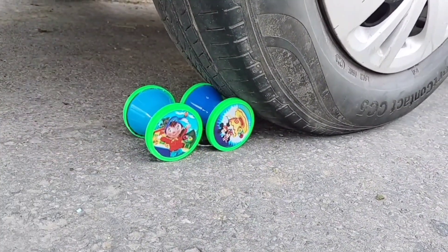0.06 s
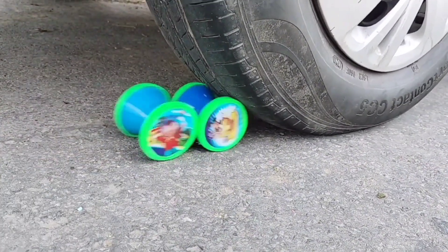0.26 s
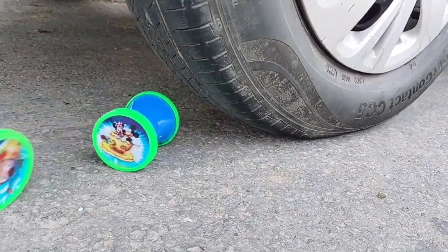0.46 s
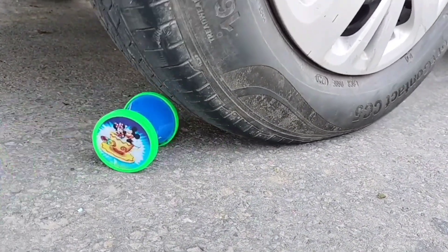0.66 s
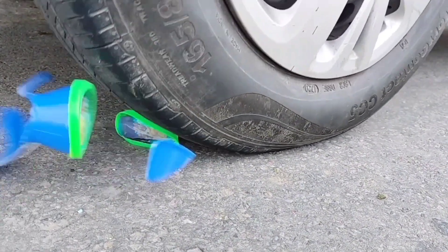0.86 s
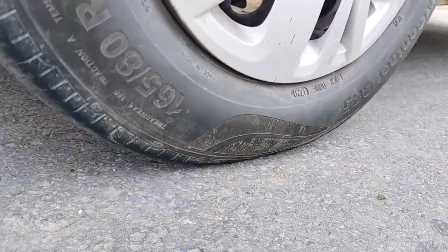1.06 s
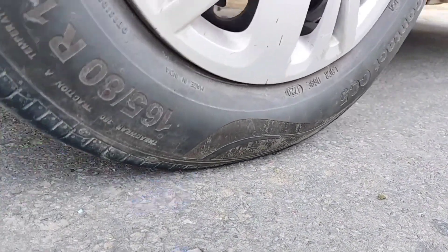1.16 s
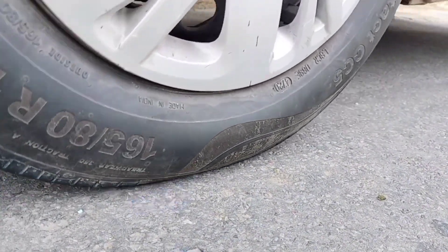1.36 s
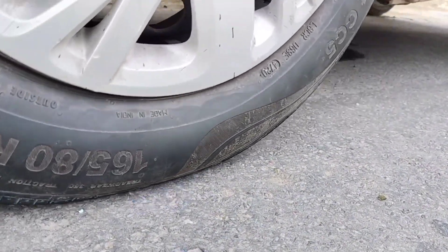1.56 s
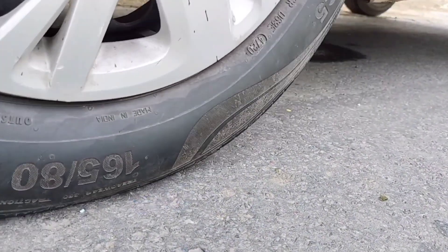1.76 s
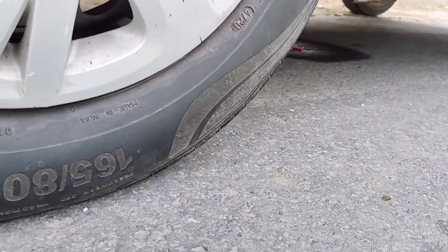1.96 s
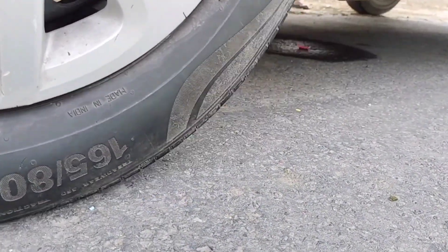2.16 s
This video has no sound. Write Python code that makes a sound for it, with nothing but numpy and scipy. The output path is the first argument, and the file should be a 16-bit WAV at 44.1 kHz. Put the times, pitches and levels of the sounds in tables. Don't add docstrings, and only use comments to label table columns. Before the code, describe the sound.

Hollow plastic toys are crushed by a car tyre on asphalt, close and left-leaning. A low engine rumbles, with faint bird chirps at 0 and 0.35 s. A creak at 0.15 leads to a sharp burst near 0.25; a rolling cup hums and rattles. Loudest cracks and hollow buckling come at 0.7-0.9, snaps and hard knocks until 1.35, then sparse ticks and knocks under low wind buffeting to 2.2.

```python
import sys
import numpy as np
from scipy import signal
from scipy.fft import rfft, irfft, next_fast_len
from scipy.io import wavfile
from scipy.ndimage import map_coordinates

SR = 44100
rng = np.random.default_rng(int(sys.argv[2]) if len(sys.argv) > 2 else 0)


def transcribe(signal):
    frames = np.atleast_2d(signal).T
    limited = np.clip(frames, -1, 1)
    pcm = np.round(limited * 32767).astype(np.int16)
    wavfile.write(sys.argv[1], SR, pcm)


def natural_amplitude(level_db):
    exponent = np.asarray(level_db, float) / 20
    return 10 ** exponent


N = 97020

# (frequency [Hz], level [dB])
SHELL_COLOUR = [(200, -16), (600, -2.5), (2000, -6), (8000, -5.5), (16000, -8)]
# (frequency [Hz], level [dB])
BURST_COLOUR = [(150, 9), (400, 6), (1300, 3.5), (3200, -4), (8900, -12.5), (16000, -6.5)]


def unit(x):
    return x / np.sqrt(np.mean(x ** 2, axis=-1, keepdims=True) + 1e-20)


def along(points, hz):
    f, v = np.transpose(points)
    return np.interp(np.log(hz + 1), np.log(f + 1), v)


def curves(rows):
    s, *cols = np.transpose(rows)
    return [np.interp(np.arange(N) / SR, s, c) for c in cols]


def wobble(rate):
    knots = rng.standard_normal(int(N * 200 / SR))
    return map_coordinates(knots, [np.arange(N) * rate / SR])


def filtered(x, response):
    n = x.shape[-1]
    m = next_fast_len(n + 8192)
    return irfft(rfft(x, m) * response(np.fft.rfftfreq(m, 1 / SR)), m)[..., :n]


def noise(spectrum, size=N):
    return unit(filtered(rng.standard_normal(size), lambda hz: natural_amplitude(along(spectrum, hz))))


def add(track, s, x):
    part = track[..., max(round(s * SR), 0):][..., :x.shape[-1]]
    part += x[..., :part.shape[-1]]


def dying(t60, rise_s=0.000063):
    t = np.arange(SR * 2 // 5) / SR
    decay = natural_amplitude(-60 * t / max(t60, .004))
    return t, decay * (1 - np.exp(-t / rise_s))


def ringing(modes):
    def response(f):
        total = 0
        for k, (c, w, db) in enumerate(modes):
            total = total + (-1) ** k * natural_amplitude(db) * 1j * f * w / (c * c - f * f + 1j * f * w)
        return total
    return response


def engine():
    # (frequency [Hz], level [dB])
    colour = [(20, -1.5), (60, 5.5), (220, -8.5), (450, -15), (1200, -30), (3000, -124)]
    shared = noise(colour)
    left = shared + 0.55 * noise(colour)
    right = shared + 0.39 * noise(colour)
    return natural_amplitude(-48 + 0.34 * wobble(11.2)) * np.array([left, right])


def wind():
    # (time [s], level [dB])
    gusts = [(0, -60), (1.1, -69), (1.2, -40.5), (1.335, -63), (1.365, -36), (1.44, -49), (1.48, -41.5),
             (1.57, -51), (1.615, -37.5), (1.72, -49), (1.79, -34), (1.81, -41), (1.87, -31), (1.93, -38),
             (1.98, -61), (2.14, -47.5), (2.2, -65)]
    # (frequency [Hz], level [dB])
    buffet = [(20, 2.5), (90, 8.5), (250, -8), (500, -92), (1200, -76)]
    lumpy = unit(natural_amplitude(3.3 * wobble(31.77)) * noise(buffet))
    left = 1.66 * np.tanh(lumpy)
    right = natural_amplitude(-16) * noise(buffet)
    return natural_amplitude(curves(gusts)[0] + 10.0) * np.array([left, right])


def bird():
    # (time [s], length [s], start pitch [Hz], end pitch [Hz], level [dB])
    chirps = [
        (0, .022, 6150, 5330, -41),
        (0.022, 0.023, 3970, 5130, -43),
        (0.351, 0.0224, 6160, 5400, -45),
    ]
    out = np.zeros(N)
    for s, length, from_hz, to_hz, db in chirps:
        u = np.linspace(0, 1, int(length * SR))
        turn = 2 * np.pi * np.cumsum(from_hz + (to_hz - from_hz) * u) / SR
        add(out, s, natural_amplitude(db) * np.sin(np.pi * u) ** .5 * np.sin(turn))
    return out


def crunch():
    # (time [s], crunch level [dB])
    press = [(0, -63.5), (.22, -55.5), (.28, -48), (.46, -48.5), (.535, -40), (.55, -57.5), (.69, -58.5),
             (.72, -36), (.86, -37.5), (1.0, -49.5), (1.15, -35.5), (1.29, -48), (1.42, -50), (1.6, -56),
             (1.7, -47), (1.9, -60.5), (2.05, -60), (2.2, -67)]
    # (frequency [Hz], level [dB])
    grit_colour = [(250, -44), (600, 0), (1500, -6), (3000, 10), (6000, 8), (9000, 5.5), (16000, -8)]
    # (frequency [Hz], width [Hz], level [dB])
    body_modes = [(915, 15, 14), (1112, 11.6, 13.5), (1297, 11, 4.5), (1533, 15, 10), (1678, 48, 10.5),
                  (2286, 36, 2.5), (2673, 90, 7), (3430, 16, -5.5), (3790, 51, -8)]
    grains_per_s, grain_hz, grain_octaves = 900, 7800, 0.66
    grain_spread_db, grain_cycles = 3, 2.5
    grind_db, body_db = 1.5, 0.5
    bright_hz, bright_grows, full_db = 6200, .85, -39

    db, = curves(press)
    count = int(min(grains_per_s * N / SR, 4000))
    when, high, size, life = rng.random((4, 4000))[:, :count]
    octaves = grain_octaves * np.log(high / (1 - high)) / 2
    hz = np.clip(grain_hz * 2 ** octaves, 3500, 21000)[:, None]
    i = np.arange(600)
    turns = hz * i / SR
    strength = natural_amplitude(grain_spread_db * np.minimum(-np.log(size), 3))[:, None]
    decay = np.exp(-turns / (grain_cycles * (life[:, None] + .3)))
    shape = strength * np.sin(2 * np.pi * turns) * decay
    place = (when * N).astype(int)[:, None] + i
    grains = np.bincount(place.ravel(), shape.ravel(), minlength=N)[:N]

    grind = unit(filtered(noise(BURST_COLOUR), lambda f: f ** 2 / (f ** 2 + 600 ** 2)))
    grit = unit(filtered(grains, lambda f: natural_amplitude(along(grit_colour, f)))) + natural_amplitude(grind_db) * grind
    treble = filtered(grit, lambda f: 1 / (1 + (bright_hz / (f + 1)) ** 6))
    grit = grit - treble * (1 - natural_amplitude(bright_grows * np.minimum(db - full_db, 0)))
    body = unit(filtered(rng.standard_normal(N), ringing(body_modes)))
    return natural_amplitude(db + 2.13 * wobble(29.41)) * (grit + natural_amplitude(body_db) * body)


def splinters():
    # (time [s], peak level [dB], pitch [Hz])
    breaks = [(0.0434, -45, 4850), (0.075, -47, 3000), (0.0918, -41.5, 7160), (0.3055, -34, 3280),
              (0.32, -32, 3000), (0.3842, -26, 4470), (0.3938, -29, 9300), (0.4034, -41, 3060),
              (0.4276, -36, 4910), (0.4374, -42, 3270), (0.5036, -32, 6300), (0.5695, -21, 5770),
              (0.5824, -38, 3100), (0.623, -24.5, 3830), (0.7228, -34, 3430), (0.737, -24, 5020),
              (0.7733, -26, 5600), (0.7976, -32, 3040), (0.7976, -27, 3500), (0.9348, -26, 4640),
              (0.958, -19, 3220), (0.9764, -39, 3460), (0.9824, -31, 5200), (1.005, -23.5, 3150),
              (1.032, -22.5, 4090), (1.066, -21, 4500), (1.1001, -20, 4960), (1.1413, -21.5, 12600),
              (1.1657, -23, 5440), (1.2154, -31, 5200), (1.2301, -22.5, 4120), (1.4365, -34, 4970),
              (1.641, -36, 5800), (1.728, -35.5, 4200), (1.7644, -45, 4070), (1.8208, -36.5, 6310),
              (2.0093, -39.5, 3300)]
    ring_db, width_share, low_hz = 2, .05, 3000
    out = np.zeros(N)
    for s, db, pitch_hz in breaks:
        t, env = dying(.014)
        others = rng.uniform(3000, 14000, size=3)
        modes = ringing([(c, width_share * c, ring_db - 6 * (c != pitch_hz)) for c in [pitch_hz, *others]])
        tick = filtered(env * rng.standard_normal(len(t)),
                        lambda f: modes(f) - 0.19 * (f / (low_hz + 1j * f)) ** 2)
        add(out, s, natural_amplitude(db + 3) * tick / np.abs(tick).max())
    return out


def creak():
    # (time [s], pitch [Hz], level [dB])
    slips = [
        (.112, 570, -52.5),
        (.138, 600, -66),
        (.146, 639, -37.5),
        (.19, 668, -55),
        (.2, 683, -42),
        (.235, 740, -71),
    ]
    t = np.arange(N) / SR
    hz, db = curves(slips)
    turn = 2 * np.pi * np.cumsum(hz + 4 * wobble(128)) / SR
    tone = np.sin(turn) + 0.037 * np.sin(3 * turn)
    return natural_amplitude(db + 15) * tone * (t > slips[0][0]) * (t < slips[-1][0])


def snaps():
    # (time [s], peak level [dB], pitch [Hz], t60 [s],
    # treble [dB])
    breaking = [(0.136, -25.5, 1420, 0.083, -5.5), (0.147, -18, 1770, 0.016, -8.5),
                (0.199, -30.5, 1000, 0.027, -6), (0.2, -29, 1680, 0.021, -27),
                (0.232, -19, 1320, 0.078, -9.5), (0.239, -17.5, 4200, 0.022, 1),
                (0.246, -1.5, 780, 0.029, -19), (0.257, -17.5, 1150, 0.19, -48),
                (0.317, -25, 1180, 0.053, -18), (0.377, -22.5, 740, 0.16, -29),
                (0.437, -25, 1490, 0.099, -40), (0.704, -31, 1630, 0.24, -14),
                (0.715, -14.5, 1050, 0.0094, -45), (0.735, -5.5, 740, 0.031, -7.5),
                (0.7718, -6, 423, 0.053, -10), (0.7935, -11.5, 430, 0.039, -9.5),
                (0.824, -9.5, 1710, 0.027, -6), (0.875, -13.5, 4020, 0.03, 6.5),
                (0.935, -16.5, 4470, 0.012, -18), (0.956, -27, 1740, 0.082, -10),
                (0.99, -25, 4900, 0.12, -2), (1.024, -17.5, 2960, 0.02, 9),
                (1.049, -22.5, 2520, 0.063, -10), (1.087, -5.5, 2130, 0.033, -4),
                (1.124, -15.5, 1680, 0.04, -16),
                (1.237, -15, 1840, 0.073, -9), (1.2548, -5.5, 855, 0.028, -16),
                 (1.2988, -29, 1780, 0.024, -28), (1.3045, -7.5, 1790, 0.038, -8.5),
                 (1.313, -25.5, 1700, 0.054, -24), (1.411, -22.5, 1610, 0.077, -13),
                 (1.468, -20, 4500, 0.043, 19), (1.51, -17.5, 1620, 0.043, -13),
                 (1.556, -26.5, 1570, 0.1, -14), (1.783, -24.5, 2450, 0.068, -2.5),
                 (1.89, -26, 6800, 0.018, -4), (1.899, -26.5, 665, 0.15, -8),
                 (1.917, -27, 2050, 0.061, -0.5), (1.977, -33.5, 3670, 0.053, -7),
                 (2.01, -37, 1550, 0.036, -6), (2.078, -21, 1400, 0.036, -8)]
    pitch_db, pitch_octaves = 13.5, 0.26
    out = np.zeros(N)
    for s, db, pitch_hz, t60, treble_db in breaking:
        t, env = dying(t60, 0.0091 * t60)

        def tint(hz):
            octaves = np.log2((hz + 1) / pitch_hz)
            return natural_amplitude(along(SHELL_COLOUR, hz) + pitch_db * np.exp(-.5 * (octaves / pitch_octaves) ** 2))

        burst = unit(filtered(rng.standard_normal(len(t)), tint))
        burst = filtered(burst, lambda hz: natural_amplitude(along([(5000, 0), (9000, treble_db)], hz)))
        burst = natural_amplitude(0.64 * wobble(230)[:len(t)]) * env * burst
        add(out, s, natural_amplitude(db - 0.5) * burst / np.abs(burst).max())
    return out


def bursts():
    # (time [s], peak level [dB], air push level [dB], left over right [dB])
    pops = [
        (0.269, -3.5, -34, -3.5),
        (0.7533, -6, -32.5, 7.5),
        (0.837, 4.5, -37, 0),
    ]
    push_s, push_pan_db = 0.0036, 39.5
    sides = np.array([[.5], [-.5]])
    out = np.zeros((2, N))
    for s, db, push_db, pan_db in pops:
        t, env = dying(0.053, 0.004)
        env = env + natural_amplitude(4.5) * dying(0.013)[1]
        a = noise(BURST_COLOUR, size=len(t))
        b = noise(BURST_COLOUR, size=len(t))
        crack = env * np.array([a, 0.033 * a + 0.55 * b]) * natural_amplitude(pan_db * sides)
        u = t / push_s
        push = natural_amplitude(push_db + 8.5) * u * (2 - u) * np.exp(-u) * natural_amplitude(push_pan_db * sides)
        add(out, s, natural_amplitude(db - 9.5) * crack + push)
    return out


def cup():
    # (time [s], level [dB])
    jolts = [(0.284, -27.5), (0.371, -26), (.49, -48), (.62, -43.5), (.74, -24.5), (.86, -47),
             (0.961, -39.5), (1.049, -33.5), (1.121, -27), (1.401, -36.5), (1.51, -43.5), (1.575, -42.5),
             (1.66, -45), (1.79, -47.5), (1.93, -45.5)]
    # (frequency [Hz], pitch wander [Hz], level [dB])
    cup_modes = [
        (509.2, 4.82, -4.5),
        (860, 8.5, -13.5),
    ]
    t, swell = np.arange(N) / SR, np.zeros(N)
    for s, db in jolts:
        add(swell, s, natural_amplitude(db + 6.5) * dying(0.38, 0.013)[1])
    swell = swell + natural_amplitude(-46 - 1.5 * t) * (t > jolts[0][0])
    hum = np.zeros(N)
    for hz, wander_hz, db in cup_modes:
        level = natural_amplitude(db + 1.4 * wobble(29.45))
        cycles = hz * t + np.cumsum(wander_hz * wobble(39.5)) / SR
        hum += level * np.sin(2 * np.pi * cycles)
    return swell * hum


def rattles():
    # (time [s], peak level [dB], long ring level [dB], pitch of the part hit hardest [Hz])
    knocks = [
        (0.5531, -9, -47, 3400),
        (0.614, -10, -44, 3510),
        (0.9001, -9, -37, 4300),
        (1.1784, 0, -40, 5760),
        (1.3449, -8, -31.5, 5500),
        (1.5454, -16.5, -60, 6300),
        (1.6157, -20, -43, 5900),
        (1.8586, -20, -49, 4360),
        (2.1839, -18.5, -45, 3400),
    ]
    # (frequency [Hz], level [dB])
    parts_modes = [(2164, -24), (2310, -4), (2530, -2), (2880, 1), (3090, -6.5), (3200, 1), (3750, -7),
                   (3880, -4), (4150, -10.5), (4670, -4.5), (4820, -13), (5170, -5), (5690, -4), (6035, -7)]
    buzz_colour = [(1200, -30), (2200, 12.5), (6000, -2.5), (9000, -11)]  # (Hz, dB)
    part_cycles = 290
    favour_db, favour_octaves = 9, 0.19
    ring_hz, ring_t60, ring_rise_s = 1545.7, 0.22, 0.011
    parts_db, buzz_db, click_db = -8, -15.5, -16
    out = np.zeros(N)
    for s, db, ring_db, part_hz in knocks:
        t, scuff = dying(0.02)
        knock = scuff * noise(SHELL_COLOUR, size=len(t))
        modes = []
        for hz, level in parts_modes:
            lift_db = favour_db * np.exp(-.5 * (np.log2(hz / part_hz) / favour_octaves) ** 2)
            detuned_hz = hz * (1 + .008 * rng.normal())
            modes.append((detuned_hz, 2.2 * hz / part_cycles, level + lift_db + rng.normal(0, 2.5)))
        parts = filtered(knock, ringing(modes)) * natural_amplitude(2.5 * wobble(250)[:len(t)])
        buzz = natural_amplitude(buzz_db) * dying(0.088)[1] * noise(buzz_colour, size=len(t))
        ring_level = natural_amplitude(ring_db + 16 + 1.5 * wobble(60)[:len(t)])
        ring = ring_level * dying(ring_t60, ring_rise_s)[1] * np.sin(2 * np.pi * ring_hz * t)
        chatter = natural_amplitude(parts_db) * (parts / np.abs(parts).max() + buzz)
        add(out, s, natural_amplitude(db) * (chatter + natural_amplitude(click_db) * knock) + ring)
    return out


def squash():
    # (time [s], level [dB])
    buckling = [
        (.705, -65),
        (.716, -26),
        (.74, -23),
        (.76, -35),
        (.774, -21),
        (.785, -34),
        (.796, -45),
        (.82, -20.5),
        (.835, -60),
    ]
    # (frequency [Hz], width [Hz], level [dB])
    hollow = [
        (404, 110, 0),
        (600, 150, -8),
        (1180, 80, -10),
    ]
    t = np.arange(N) / SR
    level = natural_amplitude(curves(buckling)[0] + 3 * wobble(150))
    groan = level * unit(filtered(rng.standard_normal(N), ringing(hollow)))
    groan = groan * (t < buckling[-1][0]) * (t > buckling[0][0])
    return groan * [[1], [-.6]]


def ports(x):
    # (frequency [Hz], level [dB])
    shadow = [(100, 9.5), (500, -3.5), (1200, -16), (3400, -18.5), (3800, -97), (16000, -55)]
    yard_db, yard_t60, yard_top_hz, lag_s = -16, 0.093, 6000, 0.00049
    t, env = dying(yard_t60, 0.003)
    tail = env * filtered(rng.standard_normal((2, len(t))), lambda hz: 1 / (1 + (hz / yard_top_hz) ** 2))
    tail = tail / np.linalg.norm(tail[0])
    wet = x + natural_amplitude(yard_db) * signal.fftconvolve(x[None], tail, axes=1)[:, :N]
    right = filtered(wet[1], lambda hz: natural_amplitude(along(shadow, hz)) * np.exp(-2j * np.pi * hz * lag_s))
    return np.array([wet[0], right])


def scene():
    near = 1.467 * (bird() + crunch() + splinters() + snaps() + rattles())
    near = near + 1.095 * (creak() + cup())
    return engine() + wind() + ports(near) + bursts() + 1.45 * squash()


def roll_off(x):
    return signal.sosfilt(signal.butter(12, 16820, fs=SR, output="sos"), x)


def record(dry):
    top_hz, above_top_db, end_hz = 15700, -22, 16800
    mix = filtered(np.tanh(dry), lambda hz: natural_amplitude(above_top_db * (hz > top_hz)) * (hz < end_hz))
    return roll_off(mix)


dry = scene()
out = record(dry)
transcribe(out)
```